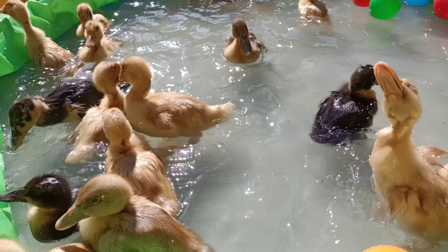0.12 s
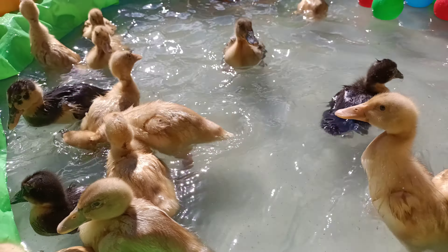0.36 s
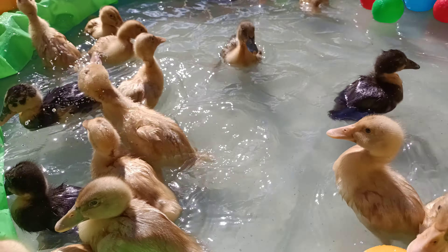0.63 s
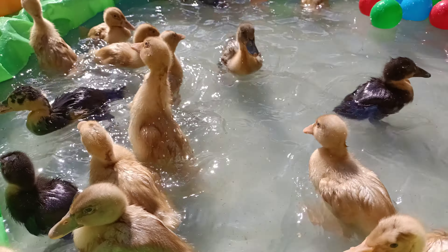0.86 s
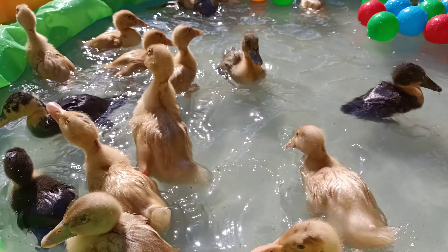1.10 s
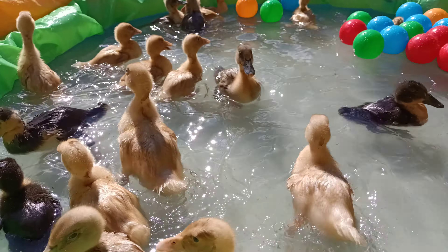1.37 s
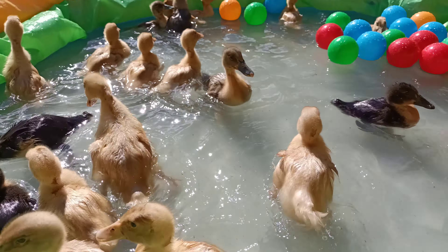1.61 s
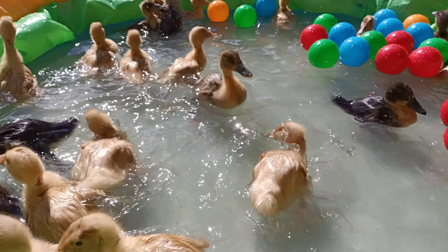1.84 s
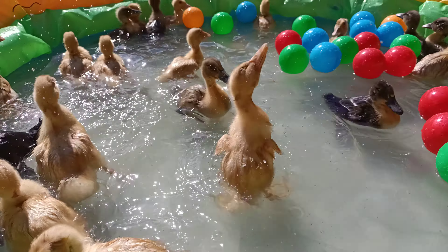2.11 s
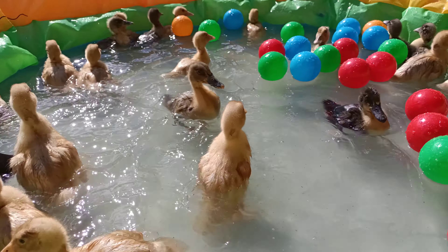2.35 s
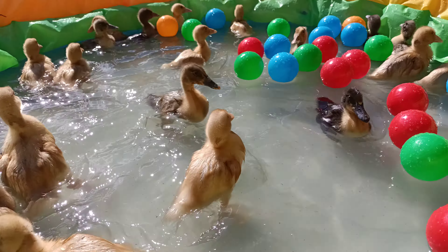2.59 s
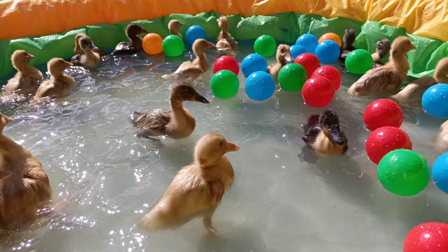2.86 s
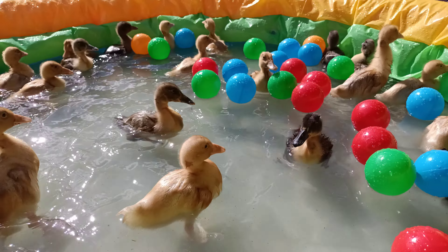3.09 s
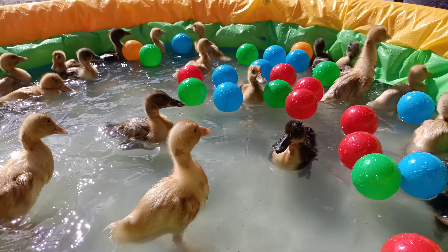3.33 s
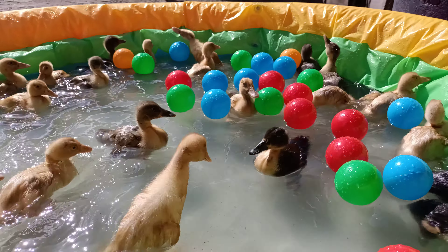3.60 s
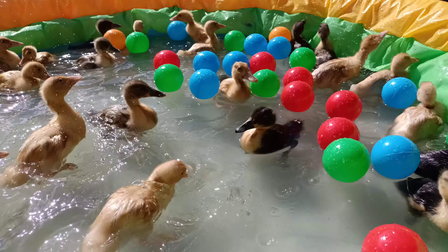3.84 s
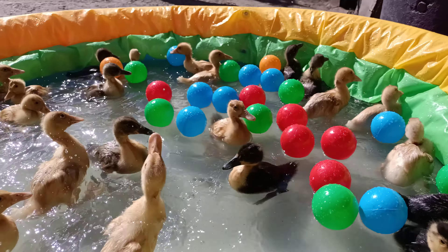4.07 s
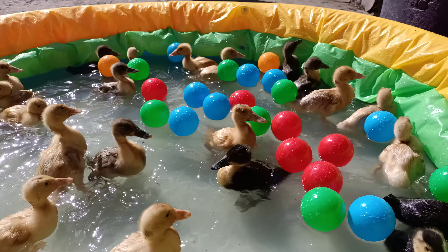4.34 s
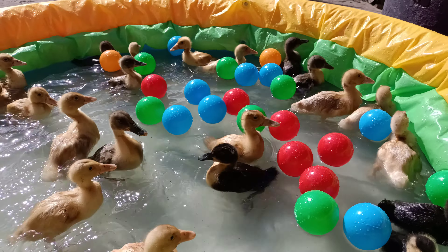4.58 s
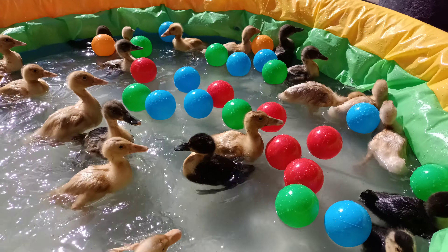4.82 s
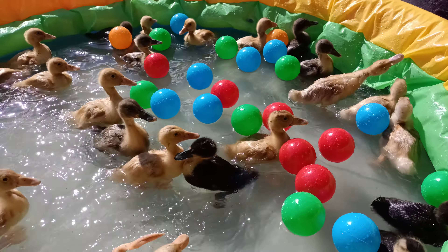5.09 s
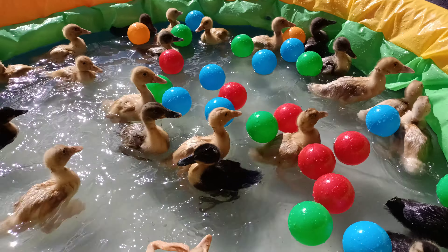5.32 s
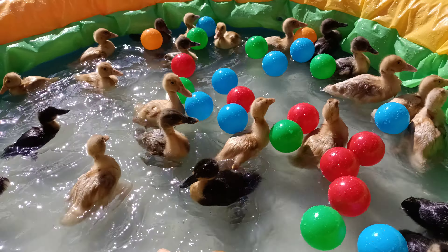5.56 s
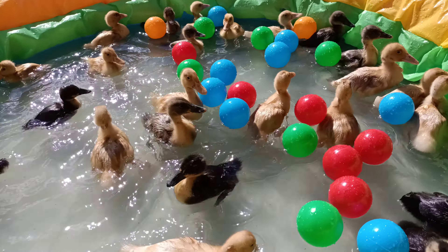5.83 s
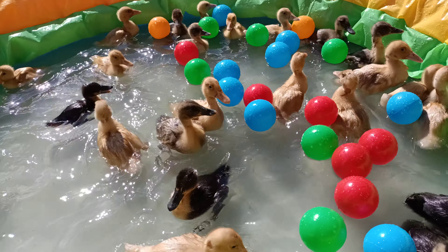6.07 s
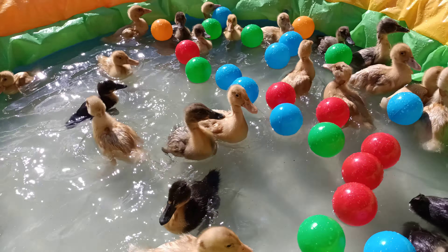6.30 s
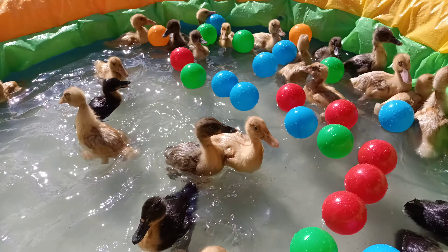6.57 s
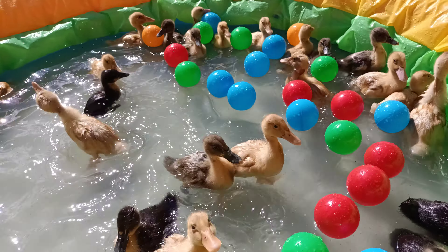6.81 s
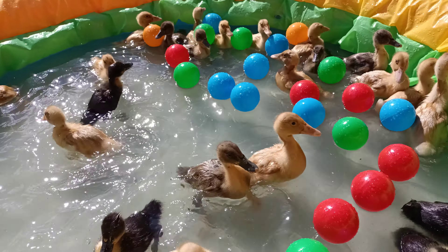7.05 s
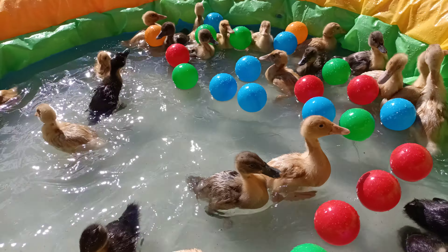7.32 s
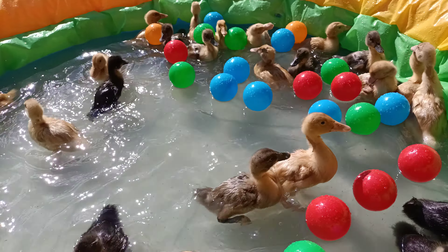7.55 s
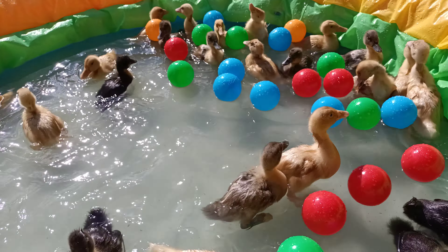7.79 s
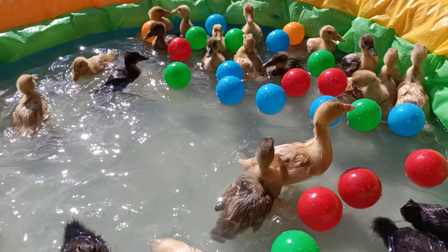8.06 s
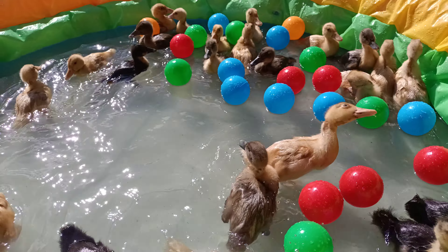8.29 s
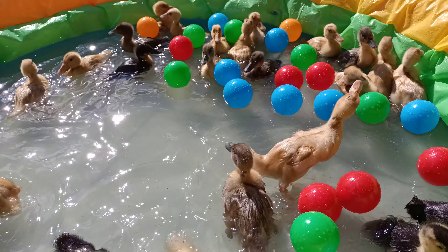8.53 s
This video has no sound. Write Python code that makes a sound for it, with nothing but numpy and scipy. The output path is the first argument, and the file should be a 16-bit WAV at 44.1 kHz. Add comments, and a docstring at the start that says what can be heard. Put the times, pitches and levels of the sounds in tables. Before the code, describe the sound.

Many ducklings chirp shrilly in restless bouts, close and distant, over gentle lapping, tiny drips and plops, with a brief thump of air midway.

```python
"""A flock of ducklings peeps in bouts around a small pool, close to a phone with two unlike microphone ports.
Each peep is a gliding whistle with weak overtones; fainter random peeps and breathy noise fill the distance.
Paddling brings plops (damped tones), ticks (noise bursts) and lapping (patchy noise).
Air buffets the right port as low noise in gusts, with pressure thumps, and something knocks against it once."""
import sys
import numpy as np
from scipy import signal
from scipy.fft import rfft, irfft, next_fast_len
from scipy.io import wavfile
from scipy.ndimage import uniform_filter1d, map_coordinates

SR = 44100
rng = np.random.default_rng(int(sys.argv[2]) if len(sys.argv) > 2 else 0)


def generate_wav(sig):
    """Save sig (samples, or channels by samples) to the path in sys.argv[1] as 16-bit PCM at SR."""
    pcm = np.round(np.clip(np.atleast_2d(sig).T, -1, 1) * 32767).astype(np.int16)
    wavfile.write(sys.argv[1], SR, pcm)


def field_ratio(decibels):
    """Amplitude ratio for a level in dB (20 dB per decade); scalars and array-likes work."""
    return 10 ** (np.asarray(decibels, dtype=float) / 20)


N = 381906

# Overtones of a peep. Each row: multiple of the pitch, left and right level in dB before facing and flutter.
OVERTONES = [(2, -28, -42), (3, -39, -57), (4, -45, -60)]
# Pressure thumps on the right port. Each row: start in seconds, level in dB, time scale in ms.
THUMPS = [(3.863, 3, 9.1), (4.53, -19, 7.6), (4.862, -12.5, 7.5), (.757, -18.5, 4.7)]
# Swoop into a full peep. Each row, relative to the note's start: seconds, Hz, dB before the contrast.
SWOOP_UP = [(-.041, -1600, -20), (-.031, -780, -8), (-.02, -400, -9), (-.01, -150, -7), (-.003, -40, -2)]
# The voice breaks and drops steeply. Each row, relative to the note's end: seconds, Hz, dB.
BREAK = [(.004, 170, -11), (.012, -120, -12), (.018, -600, -5), (.022, -950, 1.5), (.027, -1300, -10),
         (.035, -1700, -22)]
# The voice dies away. Each row, relative to the note's end: seconds, Hz, dB.
FADE = [(.007, 38, -17.5), (0.014, -150, -29)]


def along(points, hz):
    """Interpolates (Hz, value) points on a log frequency axis."""
    f, v = np.transpose(points)
    return np.interp(np.log(hz + 1), np.log(f + 1), v)


def unit(x):
    """Scaled to rms 1."""
    return x / np.sqrt(np.mean(x ** 2) + 1e-20)


def wobble(rate, count=N):
    """A smooth random curve, rate knots a second."""
    knots = rng.standard_normal(int(count * rate / SR) + 4)
    return map_coordinates(knots, [np.arange(count) * rate / SR])


def filtered(x, response):
    """x times a response of frequency."""
    m = next_fast_len(N + 8192)
    return irfft(rfft(x, m) * response(np.fft.rfftfreq(m, 1 / SR)), m)[..., :N]


def ports(db):
    """Left and right gains for a level difference, at constant total power."""
    left = field_ratio(db)
    return 2 * np.array([left, np.ones_like(left)]) / np.sqrt(1 + left ** 2)


def add(out, s, sound):
    """Mixes a stereo sound in at a time; the right port hears it 9 samples later."""
    at, right_lag = max(round(s * SR), 0), 9
    out[0, at:at + sound.shape[1]] += sound[0]
    out[1, at + right_lag:at + right_lag + sound.shape[1]] += sound[1]


def rush(spectrum, patchy_db):
    """Patchy stereo noise as the two ports colour it; the mean of both has rms 1."""
    # Each row: Hz, left minus right in dB.
    port_points = [(60, -8), (300, -1.5), (1800, -2.5), (3000, -7), (5000, 0.5), (6800, -32), (9800, 34),
                   (15000, -2.5)]
    # Each row: Hz, left-right likeness from 0 to 1.
    alike = [(400, 0.77), (1500, 0)]
    z = signal.stft(rng.standard_normal((2, N)), nperseg=512)[2]
    patches = rng.standard_normal(z.shape[1:])
    field = uniform_filter1d(uniform_filter1d(patches, 6, 0), 8, 1)
    noise = signal.istft(z * field_ratio(patchy_db * unit(field)), nperseg=512)[1][:, :N]

    def mid_side(hz):
        turn = np.arccos(np.clip(along(alike, hz), -1, 1)) / 2
        return field_ratio(along(spectrum, hz)) * [np.cos(turn), np.sin(turn)]

    mid, side = filtered(noise, mid_side)
    pair = filtered(np.array([mid + side, mid - side]), lambda hz: ports(along(port_points, hz)))
    return pair / np.std(pair.mean(0))


def glint(x):
    """Short broad sounds as the ports colour them: the left rings near 10 kHz."""
    def response(hz):
        ring = 1 / np.hypot(1, (hz ** 2 - 9800 ** 2) / (2600 * hz + 1))
        floor = field_ratio(-16)
        both = np.array([ring + floor, floor / (1 + (hz / 8000) ** 8)])
        return both * hz ** 2 / (hz ** 2 + 2500 ** 2) / (1 + (hz / 13500) ** 10)

    return filtered(x, response)


def pool_wall(x):
    """The soft ring wall and the water surface give a short answer: decaying noise after 3 ms."""
    t = np.arange(SR // 4) / SR
    tail = rng.standard_normal((2, len(t))) * field_ratio(-60 * t / 0.19) * (t > .003)
    return signal.fftconvolve(x, tail / np.linalg.norm(tail[0]), axes=1)[:, :N]


def buffeting():
    """Air on the ports, far stronger on the right: lumpy low noise that starts fast and decays in gusts."""
    # Each row: start in seconds, level in dB, decay time in seconds.
    buffet = [(0.749, -30, 0.087), (3.761, -27.5, 0.29), (3.878, -33.5, 0.32), (4.901, -21.5, 0.092),
              (5.218, -22.5, 0.066), (5.411, -39, 0.56), (8.001, -17.5, 0.027)]
    # Each row: Hz, relative level in dB per Hz.
    rumble = [(20, 9), (45, 1), (130, -9.5), (600, -51.5)]
    t = np.arange(N) / SR
    gusts = field_ratio(-51.5)
    for s, db, decay in buffet:
        onset = np.clip((t - s) / 0.0023, 0, 1)
        gusts = gusts + field_ratio(db) * onset * np.exp(-np.abs(t - s) / decay)
    noise = rng.standard_normal((2, N))
    air = filtered(noise, lambda hz: field_ratio(along(rumble, hz)) * (hz > 18))
    air = unit(unit(air) * field_ratio(2.5 * wobble(12)))
    return gusts * field_ratio([[-30], [0]]) * air


def thumps():
    """Pressure thumps on the right port: a quick dip, then a slower rebound."""
    out = np.zeros((2, N + SR))
    for at, db, ms in THUMPS:
        u = np.arange(SR // 8) / SR * 1000 / ms
        dip = np.sin(np.pi * np.clip(u / 0.28, 0, 1)) ** 2
        rise = np.sin(np.pi / 2 * np.clip((u - .15) / .5, 0, 1)) ** 2
        rebound = rise * np.exp(-u) * np.cos(u)
        add(out, at, field_ratio([[db - 65], [db]]) * (0.75 * rebound - dip))
    return out[:, :N]


def lapping():
    """Lapping water: patchy noise whose level swells slowly and ripples faster."""
    # Each row: Hz, relative level in dB per Hz.
    lap_points = [(60, 0), (460, -9), (970, -15), (1600, -11.5), (3000, -13.5), (4300, -29), (6400, -43),
                  (10000, -36), (12700, -34.5), (16000, -61.5)]
    swell_db = 1.2 * wobble(3) + 2.2 * wobble(12)
    return field_ratio(-48 + swell_db) * rush(lap_points, patchy_db=4.5)


def plop(hz, cycles, rise, count=2200):
    """A bubble: a damped tone whose pitch rises."""
    t = np.arange(count) / SR
    u = t * hz / cycles
    return np.sin(2 * np.pi * hz * t * (1 + rise * u)) * np.exp(-u) * (1 - np.exp(-t / 0.0001))


def bubbling():
    """Plops of paddling feet, ringing drips, slop after each thump and random small bubbles, with echo."""
    # Paddling feet. Each row: start in seconds, relative level in dB, pitch in Hz, left minus right in dB.
    foot_plops = [(0.306, -24.5, 480, -2), (0.413, -25.5, 500, -1), (3.773, -23.5, 716, -2),
                  (4.769, -26, 640, -3), (5.718, -28, 395, -2), (6.447, -14, 520, -0.5),
                  (6.706, -12.5, 504, -2), (8.153, -21, 580, -1), (8.311, -11.5, 1700, 24),
                  (8.295, -29, 480, -6), (.116, -33, 335, -2), (2.168, -30.5, 480, -3),
                  (2.81, -27.5, 670, -2), (3.228, -26, 540, -1), (4.141, -24, 216, -19),
                  (8.367, -23, 760, -2)]
    # Ringing drips. Each row: start in seconds, level in dB before damping, pitch in Hz, life in cycles.
    drips = [(8.17, -29.5, 520, 5), (8.242, -30.5, 1300, 9.7), (8.247, -36.5, 843, 11.5),
             (8.316, -22.5, 1540, 13), (8.349, -32, 1550, 8), (8.406, -35, 1285, 23), (5.72, -34, 1135, 9)]
    out = np.zeros((2, N + SR))
    both = np.ones((2, 1))
    for s, db, hz, pan in foot_plops:
        gain = field_ratio(db + 4.5) * ports(np.array([pan])) / 2
        add(out, s, gain * plop(hz, cycles=0.95, rise=0.006))
    for s, pitch, size, pan in rng.random((400, 4)):
        gain = field_ratio(-51.5 - 3.5 * np.log(size + 0.012)) * ports(np.array([8 * pan - 6]))
        add(out, s * N / SR, gain * plop(200 * 8 ** pitch, cycles=0.68, rise=0.073, count=1000))
    for s, db, hz, cycles in drips:
        ending = np.hanning(4400)[2200:]
        add(out, s, field_ratio(db) * both * plop(hz, cycles, rise=0.031) * ending)
    gurgle_s, gurgle_db = .16, -44  # span of the slop, level of its smallest plops
    for at, *_ in THUMPS:
        for s, pitch, size in rng.random((14, 3)):
            sound = plop(150 * 7 ** pitch, cycles=2.2, rise=.06)
            add(out, at + gurgle_s * (s - .15), field_ratio(gurgle_db + 12 * size) * both * sound)
    for s, pitch, size in rng.random((1100, 3)):
        sound = plop(700 * 4 ** pitch, cycles=0.78, rise=0.05, count=300)
        add(out, s * N / SR, field_ratio(-55.5 - 4.1 * np.log(size + .003)) * both * sound)
    return out[:, :N] + field_ratio(-7.5) * pool_wall(out)


def tick(t60):
    """A droplet's burst of noise, falling 60 dB in t60 seconds."""
    t = np.arange(500) / SR
    return rng.standard_normal((2, len(t))) * field_ratio(-60 * t / t60)


def droplets(excitement):
    """Droplets as noise bursts, some near the left port, and one knock against the phone; the random spray
    swells as the flock stirs."""
    # Droplets, and at 3.83 s a hard knock against the phone. Each row: start in seconds, relative level in dB,
    # left minus right in dB.
    drop_ticks = [(0.385, -27, -9), (3.386, -23.5, -2), (3.79, -27, -10), (3.806, -26, -10),
                  (3.8196, -14, -12), (3.8315, 0.5, -28), (6.5826, -30, -3), (0.308, -29, -2),
                  (.345, -33, -4), (1.935, -17, -7), (4.779, -23.5, 0), (4.853, -25, 3), (6.475, -30, 13),
                  (6.94, -29, -2), (8.148, -22, 4), (3.376, -28, -8), (8.565, -20.5, -4), (8.598, -32, 0)]
    # Fine droplets near the left port. Each row: start in seconds, relative level in dB.
    fine_drops = [(0.031, -33), (3.2063, -34), (4.553, -37), (4.6753, -38), (4.819, -34), (5.5454, -32),
                  (5.9184, -36.5), (6.334, -40), (6.4775, -36.5), (7.41, -39), (7.8466, -37.5),
                  (8.0225, -40.5), (8.136, -40), (8.3833, -36.5)]
    ticks, fine, spray = np.zeros((3, 2, N + SR))
    for s, db in fine_drops:
        add(fine, s, field_ratio(db + 10.5) * tick(0.01))
    for s, db, pan in drop_ticks:
        add(ticks, s, field_ratio(db + 5) * ports(np.array([pan])) * tick(0.003))
    for s, size in rng.random((500, 2)):
        add(spray, s * N / SR, field_ratio(-45 - 4 * np.log(size + 0.01)) * tick(0.0052))

    def bright(hz):
        return hz ** 2 / (hz ** 2 + 900 ** 2) / (1 + (hz / 3600) ** 3) / (1 + (hz / 11000) ** 10)

    stir = (excitement[0] / excitement[0].mean()) ** .9
    return filtered(ticks[:, :N], bright) + glint(fine[:, :N]) + stir * glint(spray[:, :N])


def peep(row, lead, ending, facing_db, out, jitter, scatter_db, overtones=OVERTONES, contrast=1):
    """One whistle: a lead-in, a straight glide that wavers slightly, an ending; overtones ride on its phase."""
    # A gentle peep fades in along its own glide. Each row: seconds from the start, dB before the contrast.
    ease_in = [(-.018, -16.5), (-.006, -5.5)]
    # The small throat sounds low pitches weakly. Each row: Hz, dB.
    throat = [(1500, -24), (2000, -9), (2450, 0)]
    # The left port is weak around 3050 Hz. Each row: Hz, dB.
    left_dip = [(2600, -3.5), (3050, -25), (3400, -6.5), (3800, -4.5), (4300, -3.5)]
    # The left port favours some overtones. Each row: Hz, dB.
    left_ring = [(5500, -18), (6600, -13), (7500, 0), (8000, 3), (10000, 2), (11500, 0), (13000, -14)]
    steep_hz_per_s = 3700  # a peep without a set lead-in swoops up if it climbs faster than this
    hoarse = .08  # share of fast random flutter in the voice
    s0, s1, hz0, hz1, db0, db1 = row
    glide = (hz1 - hz0) / (s1 - s0)
    if not lead:
        eased = [(s, s * glide, db) for s, db in ease_in]
        lead = SWOOP_UP if glide > steep_hz_per_s else eased
    opening = np.multiply(lead + [(0.0006, 0.0087, 0)], (1, 1, contrast)) + (s0, hz0, db0)
    closing = np.add([(0.0015, 0.0033, 0.0069)] + ending, (s1, hz1, db1))
    s, hz, db = np.vstack([opening, closing]).T
    t = np.arange(max(s[0], 0), s[-1], 1 / SR)
    count = len(t)
    pitch = uniform_filter1d(np.interp(t, s, hz), size=130) * (1 + jitter * wobble(156.7, count))
    level_db = np.interp(t, s, db) + along(throat, pitch) + scatter_db * wobble(124.4, count)
    size = field_ratio(level_db) * np.sqrt(2) * (1 + hoarse * wobble(500, count))
    phase = 2 * np.pi * np.cumsum(pitch) / SR
    left = field_ratio(facing_db + along(left_dip, pitch))
    sound = np.array([left * np.sin(phase + rng.normal(0, .6)), np.sin(phase)])
    for k, left_db, right_db in overtones:
        left_level = left_db + 0.6 * facing_db + along(left_ring, k * pitch)
        gains = field_ratio([left_level, np.full(count, right_db)])
        sound = sound + gains * field_ratio(4 * wobble(33, count)) * np.sin(k * phase)
    add(out, t[0], size * sound)


def bouts(near):
    """How loud the flock is at each port: the others join in with the near birds and never quite stop."""
    power = uniform_filter1d(uniform_filter1d(near ** 2, size=1800), size=1300)
    return (np.abs(power / power.mean()) + field_ratio(-71.5)) ** 0.26


def far_birds(excitement):
    """Many fainter, rougher peeps at random, rising or sagging, following the bouts."""
    out = np.zeros((2, N + SR))
    for s, top, life, size, pan, slope, swell in rng.random((600, 7)):
        s, hz, db = s * N / SR, 2700 + 1200 * top, -48 + 11 * size
        row = (s, s + .01 + 0.045 * life, hz, hz + 700 * (slope - .4), db, db + 12 * (swell - .5))
        lead = SWOOP_UP if size > .4 else None
        ending = BREAK if swell > .55 else FADE
        peep(row, lead, ending, 12 * (pan - .5), out, jitter=.011, scatter_db=4, overtones=OVERTONES[1:2])
    return excitement * out[:, :N]


def haze(excitement):
    """The breathy haze of the whole flock: fluttering noise that follows the bouts."""
    # Each row: Hz, relative level in dB per Hz.
    breath = [(1000, -69), (3300, 6.5), (4200, 0), (4900, -9), (6500, -23.5), (9800, -9.5), (13000, -45),
              (16000, -65.5)]
    flutter_db = 4 * wobble(16)
    bout = (excitement[0] / excitement[0].mean()) ** 1.1
    return field_ratio(-51 + flutter_db) * rush(breath, patchy_db=4) * bout


def squeals():
    """A high-voiced bird's thin unsteady whistles sweep up out of the chorus, round over and fall back."""
    # Each row: start and end in seconds, top pitch in Hz before wavering, left level in dB before wavering.
    squeal_rows = [(5.904, 5.967, 5300, -47), (6.368, 6.429, 5280, -49), (7.179, 7.239, 5020, -45),
                   (7.57, 7.638, 5300, -49), (7.766, 7.809, 5100, -52)]
    from_hz = 3700
    out = np.zeros((2, N + SR))
    for start, end, top_hz, db in squeal_rows:
        bow = np.abs(np.sin(np.linspace(0, np.pi, round((end - start) * SR))))
        waver = 1 + .016 * wobble(300, count=len(bow))
        pitch = (from_hz + (top_hz - from_hz) * bow ** .8) * waver
        size = field_ratio([[db], [db - 5]]) * field_ratio(6 * wobble(150, count=len(bow))) * bow ** .3
        add(out, start, size * np.sin(2 * np.pi * np.cumsum(pitch) / SR))
    return out[:, :N]


def rasps():
    """A slower second oscillation: high harmonics of a pulse near 650 a second, arching in pitch."""
    # One bird's buzz at the height of its peep. Each row: start and end in seconds.
    rasp_spans = [(5.952, 5.99), (6.372, 6.415), (6.817, 6.865), (7.193, 7.23), (7.578, 7.61)]
    db = -39  # left level before the ports colour it
    out = np.zeros((2, N + SR))
    for start, end in rasp_spans:
        u = np.linspace(0, 1, round((end - start) * SR))
        rate = 650 * (1 + .04 * np.sin(np.pi * u) + .02 * wobble(300, count=len(u)))
        phase = 2 * np.pi * np.cumsum(rate) / SR
        comb = np.sin(np.arange(13, 17)[:, None] * phase).sum(0)
        add(out, start, field_ratio([[db], [db - 6]]) * np.sin(np.pi * u) ** .5 * comb)
    return glint(out[:, :N])


def near_birds():
    """The peeps that stand out, and a hoarse call; a puff of air escapes where the voice breaks."""
    # Each row of the five peep tables: start and end of the note in seconds, first and last pitch in Hz,
    # first and last level in dB at the right port, before throat and scatter.
    # Peeps that end in a break of the voice and a steep drop.
    breaking = [(0.135, 0.194, 3535, 3656, -17, -20.5), (0.384, 0.457, 3800, 3550, -32, -29),
                (0.559, 0.613, 3240, 3325, -28, -27), (0.661, 0.696, 3860, 4270, -42.5, -38),
                (0.818, 0.89, 3820, 3650, -29.5, -28.5), (1.509, 1.57, 3236, 3550, -17.5, -18.5),
                (1.938, 2, 3394, 3534, -15, -20.5), (2.395, 2.458, 3403, 3487, -14.5, -15.5),
                (2.833, 2.895, 3370, 3546, -15, -19), (3.215, 3.302, 3276, 3523, -14.5, -13),
                (4.013, 4.077, 3540, 3710, -17.5, -22), (4.494, 4.553, 3690, 3624, -28, -23),
                (4.971, 5.034, 3764, 3647, -22, -22), (5.924, 5.979, 3970, 3814, -23.5, -23),
                (6.349, 6.415, 3770, 4010, -23, -34.5), (6.392, 6.42, 3060, 3160, -19.5, -26),
                (6.555, 6.649, 3510, 3410, -34, -31), (6.789, 6.862, 3630, 3842, -26.5, -32.5),
                (7.108, 7.14, 3150, 3300, -33, -36), (7.167, 7.23, 3740, 3950, -23.5, -24),
                (7.565, 7.601, 3760, 3786, -36.5, -28.5), (7.65, 7.743, 3080, 3227, -34.5, -31.5),
                (7.745, 7.762, 3300, 3350, -40, -35)]
    # Peeps given a short downward lead-in and a break, some only brief falling chirps.
    short_lead = [(1.241, 1.279, 3250, 3150, -8.5, -19.5), (3.24, 3.3, 3050, 2700, -11.5, -25.5),
                  (3.622, 3.702, 3480, 3820, -13.5, -14), (6.858, 6.861, 4300, 3850, -37.5, -20),
                  (3.57, 3.62, 3080, 2750, -8.5, -21.5), (1.722, 1.735, 2900, 2800, -18, -24),
                  (5.71, 5.76, 2700, 2930, -23, -33.5), (5.787, 5.788, 3000, 3400, -42, -35.5),
                  (7.465, 7.474, 3100, 3600, -53, -38.5)]
    # Peeps that swoop up into their note and die away.
    arching = [(2.672, 2.73, 3980, 2960, -35.5, -26.5), (1.07, 1.122, 3340, 3530, -25.5, -17.5),
               (1.128, 1.165, 2770, 3010, -28.5, -19.5), (1.775, 1.82, 3780, 3820, -21.5, -14.5),
               (3.145, 3.21, 3490, 2880, -28, -17.5), (3.535, 3.553, 3540, 3470, -14.5, -30.5),
               (3.495, 3.56, 3940, 4060, -28.5, -33.5), (3.92, 3.965, 4000, 3750, -35, -35),
               (4.275, 4.31, 3400, 2900, -44, -37), (5.178, 5.2, 3500, 3800, -36.5, -35),
               (4.762, 4.86, 3800, 3950, -34, -33.5), (5.49, 5.552, 3650, 3730, -30, -30),
               (5.482, 5.515, 2700, 3230, -29.5, -31.5), (7.852, 7.915, 3400, 3545, -41, -36),
               (7.025, 7.125, 3760, 3670, -36, -30.5), (6.535, 6.62, 3980, 3760, -38.5, -25),
               (8.395, 8.46, 3760, 3840, -34.5, -26.5)]
    # Peeps that sag, then climb and die away.
    scooped = [(.948, .99, 2953, 3280, -15.5, -11.5), (1.276, 1.303, 3674, 3960, -17, -22)]
    # Peeps that simply die away.
    fading = [(.015, .062, 3630, 3630, -26.5, -22), (.035, .09, 3403, 3340, -33, -27),
              (.075, .115, 3940, 4280, -23.5, -25.5), (.588, .635, 2820, 2286, -18, -24),
              (1.14, 1.195, 3680, 3600, -22, -19.5), (1.205, 1.225, 3800, 3830, -22, -21.5),
              (1.38, 1.4, 3730, 3770, -35, -41), (3.035, 3.125, 3040, 3357, -28.5, -29),
              (1.345, 1.388, 2800, 2694, -20.5, -30), (1.67, 1.705, 3026, 2820, -21, -20.5),
              (1.755, 1.814, 3088, 3155, -13, -20.5), (2.13, 2.178, 3260, 3240, -13.5, -22),
              (2.2, 2.225, 3140, 3020, -25.5, -23), (2.233, 2.278, 2900, 3126, -21, -19),
              (2.29, 2.355, 3730, 4300, -23.5, -37.5), (2.31, 2.378, 3595, 3896, -21.5, -27.5),
              (2.515, 2.57, 3220, 2660, -26, -33), (2.738, 2.77, 3170, 3006, -17.5, -22),
              (2.778, 2.815, 3004, 3127, -12.5, -12), (2.79, 2.86, 3510, 3820, -29, -31.5),
              (2.93, 2.975, 3270, 2950, -22, -24.5), (2.99, 3.02, 4000, 4390, -33, -36.5),
              (2.99, 3.02, 3486, 3230, -16, -31.5), (2.94, 2.981, 3535, 3625, -14, -17.5),
              (3.185, 3.216, 3370, 3380, -23, -20), (3.21, 3.26, 3880, 4160, -34.5, -28.5),
              (3.575, 3.59, 4200, 4360, -26.5, -28), (3.608, 3.655, 3910, 3890, -26.5, -26),
              (3.682, 3.728, 3255, 3390, -18.5, -14), (3.975, 4.035, 4060, 4306, -31, -34.5),
              (4.4, 4.46, 3216, 3443, -34.5, -32.5), (8.652, 8.658, 2970, 3020, -32, -35),
              (5.222, 5.27, 3240, 2970, -27.5, -27), (4.035, 4.095, 3020, 2620, -24.5, -42),
              (4.36, 4.45, 3920, 3720, -36, -34), (4.915, 4.96, 2896, 2440, -24, -35.5),
              (5.212, 5.275, 3694, 3740, -23, -27), (8.05, 8.098, 3690, 3430, -36, -39),
              (5.525, 5.545, 3170, 2850, -32.5, -23), (5.556, 5.589, 2823, 2990, -19, -21),
              (5.65, 5.695, 3624, 3815, -24.5, -35), (5.66, 5.699, 3420, 3425, -35.5, -25),
              (5.665, 5.712, 3010, 2750, -22, -22), (6.075, 6.125, 3354, 3400, -24.5, -37),
              (6.14, 6.185, 3594, 3660, -25.5, -30.5), (6.09, 6.129, 3704, 3755, -26.5, -30),
              (6.445, 6.475, 3070, 3230, -25.5, -29.5), (6.8, 6.85, 3160, 3400, -29.5, -45),
              (7.375, 7.445, 3090, 3580, -31, -38), (6.7, 6.76, 3500, 3755, -44, -40.5),
              (7.285, 7.35, 3680, 3200, -38, -31.5), (7.525, 7.545, 3430, 3560, -38.5, -30),
              (7.815, 7.86, 3900, 3730, -40, -32.5), (7.93, 8.025, 3740, 3600, -30.5, -25.5),
              (7.93, 7.975, 3297, 3150, -27, -27.5), (8.155, 8.212, 3550, 3425, -38, -24.5),
              (8.225, 8.25, 3870, 4020, -36, -34), (8.43, 8.46, 3495, 3690, -48, -21.5)]
    # The short downward lead-in. Each row, relative to the note's start: seconds, Hz, dB before the contrast.
    downward_lead = [(-.014, 190, -24), (-.008, 110, -5)]
    # A slow sag before a climbing note, in the same columns.
    scoop = [(-.042, 194, -25), (-.036, 142.5, -7.5), (-.015, 1, -7)]
    # The phone turns to and from the callers. Each row: seconds, left minus right in dB before port colour.
    facing_points = [(0, 2.5), (.2, -5), (1, -9.5), (1.5, -9), (2, -4), (2.5, -15), (3.6, -10.5),
                     (3.95, -6), (4.4, -1), (5.5, -1.5), (6.3, -2), (7.3, -6.5), (8.1, -3.5), (8.6, 7)]
    # A hoarse, airy call near the left port: start and end in seconds, level in dB before port colour.
    hiss = (0.027, 0.15, -36)
    out, puffs = np.zeros((2, 2, N + SR))

    def facing(s):
        return np.interp(s, *np.transpose(facing_points))

    kinds = [(breaking, SWOOP_UP, BREAK), (short_lead, downward_lead, BREAK), (arching, SWOOP_UP, FADE),
             (scooped, scoop, FADE), (fading, None, FADE)]
    for rows, lead, ending in kinds:
        for row in rows:
            # fainter birds sound more broken, louder ones burst into their note
            far = np.clip((-22 - max(row[4:])) / 12, 0, 1)
            peep(row, lead, ending, facing(row[0]), out, jitter=.003 + .007 * far,
                 scatter_db=1.2 + 3.5 * far, contrast=1.6 - .8 * far)
    for _, end, _, _, _, db in breaking + short_lead:
        puff = np.hanning(300) * rng.standard_normal((2, 300))
        add(puffs, end + 0.0046, field_ratio(db + facing(end) - 5.5) * puff)
    start, end, hiss_db = hiss
    count = round((end - start) * SR)
    add(puffs, start, field_ratio(hiss_db) * np.hanning(count) ** .3 * rng.standard_normal((2, count)))
    return out[:, :N] + glint(puffs[:, :N])


def scene():
    """All sources at the two ports; the birds also echo off the pool."""
    near = near_birds()
    excitement = bouts(near)
    birds = near + rasps() + squeals() + far_birds(excitement) + haze(excitement)
    echo = field_ratio(-15) * pool_wall(birds)
    water = bubbling() + droplets(excitement) + lapping()
    return birds + echo + water + buffeting() + thumps()


def roll_off(x):
    """The treble ends steeply here."""
    return signal.sosfilt(signal.butter(12, 16650, fs=SR, output="sos"), x)


def record(dry):
    """High peaks are rounded off, and the sound is limited to 15.8 kHz."""
    soft = dry / (1 + np.abs(dry / .9) ** 4) ** .25
    mix = filtered(soft, lambda hz: hz < 15800)
    return roll_off(mix)


dry = scene()
out = record(dry)
generate_wav(out)
```